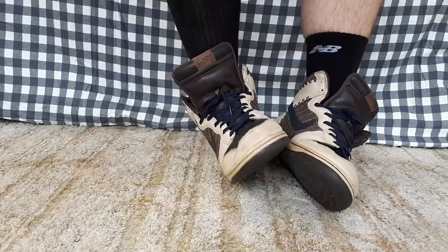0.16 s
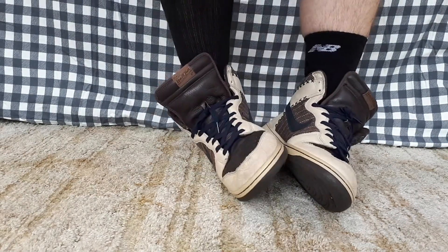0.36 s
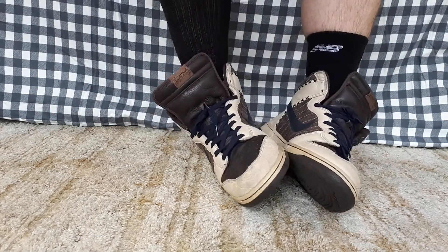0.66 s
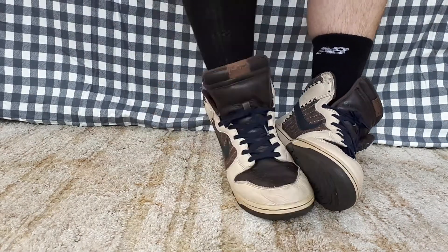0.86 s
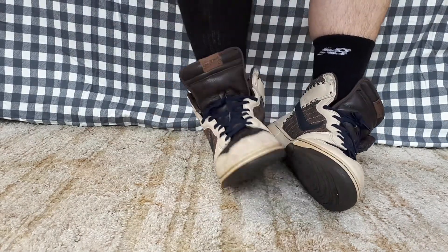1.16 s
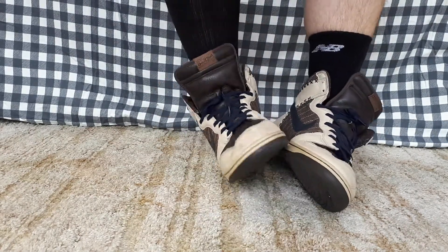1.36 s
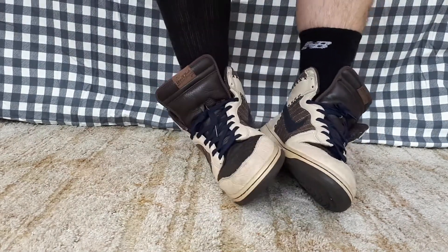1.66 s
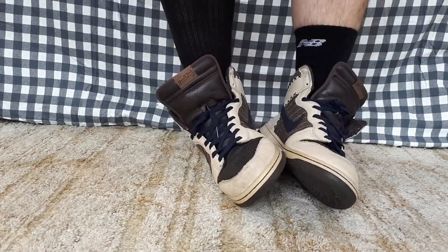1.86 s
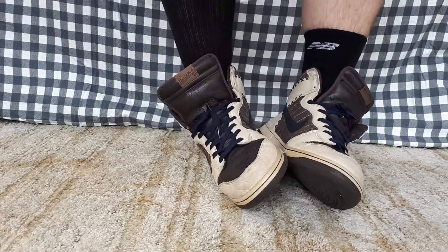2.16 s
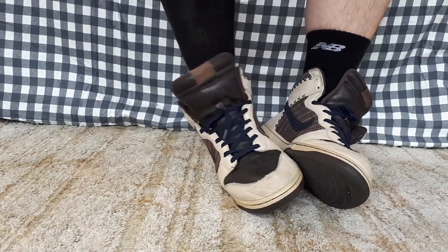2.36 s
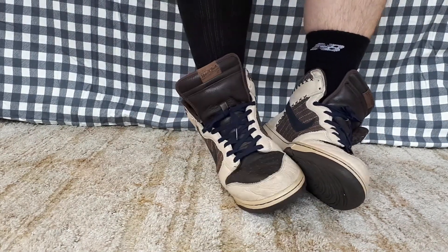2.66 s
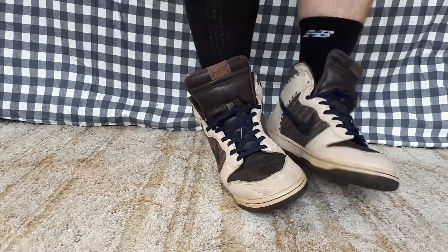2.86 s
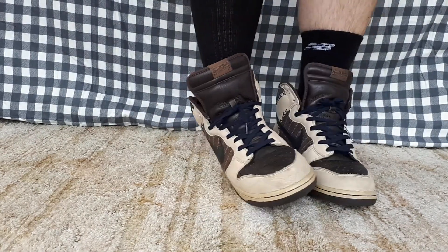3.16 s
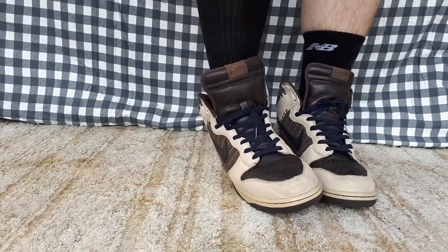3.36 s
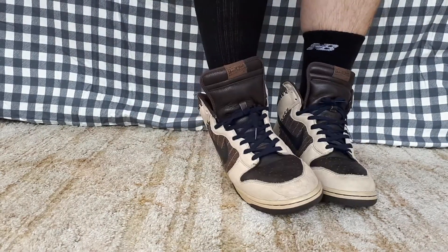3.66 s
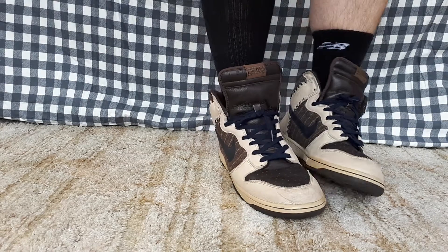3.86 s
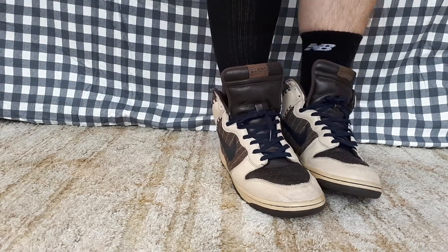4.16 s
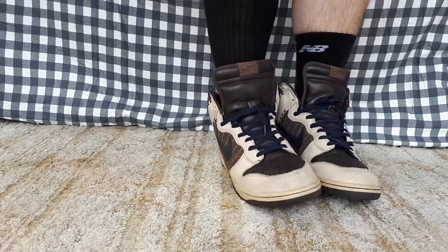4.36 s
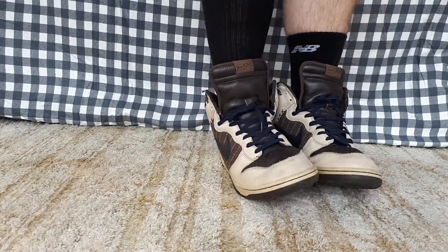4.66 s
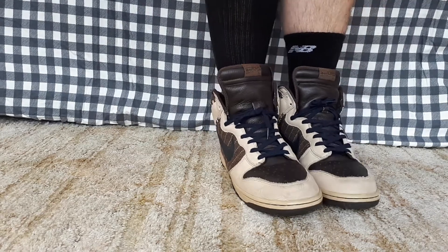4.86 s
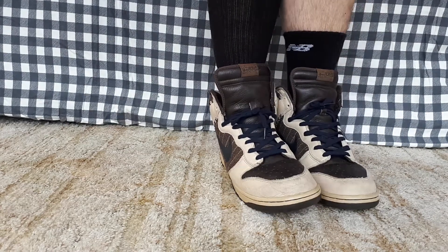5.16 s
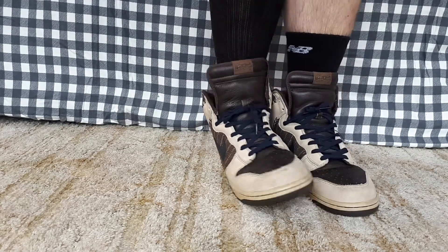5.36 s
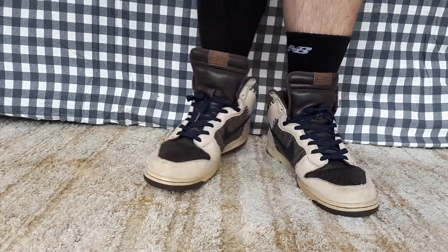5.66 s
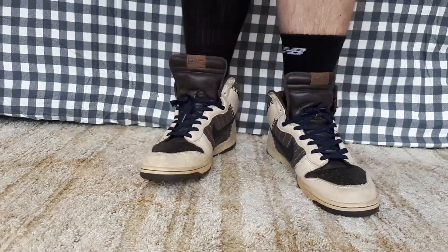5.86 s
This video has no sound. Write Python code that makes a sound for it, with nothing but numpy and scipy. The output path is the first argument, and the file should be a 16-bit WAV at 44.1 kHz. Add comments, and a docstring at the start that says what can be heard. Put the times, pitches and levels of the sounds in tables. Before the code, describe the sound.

In a small, quiet room, sneakers are rocked, knocked together and set down on carpet near the microphone. One sharp knock early on is the loudest sound; another knock and then a short patter of duller blows follow, well apart, each with a low floor thud and a clap of leather. Between them are light heel and toe touches, faint leather creaks and soft sliding over the pile.

```python
"""A faint tap on carpet, then a hard knock: two leather sneakers are rocked, knocked together and set down,
close to a phone in a small quiet room. Each blow knocks the rubber sole, thuds the floor, claps the
leather and ticks at its edge; the room answers briefly. The uppers crack and crease, lace tips flick
and the soles squeak once. Between the blows the shoes brush softly over the pile."""
import sys
import numpy as np
from scipy import signal
from scipy.fft import rfft, irfft
from scipy.io import wavfile
from scipy.ndimage import uniform_filter1d

SR = 44100
rng = np.random.default_rng(int(sys.argv[2]) if len(sys.argv) > 2 else 0)


def digitize_waveform(pressure):
    """Quantize a signal to 16-bit integers and store it at the path in sys.argv[1].

    Rows of a 2-D input are taken as channels; values are limited to [-1, 1].
    """
    field = np.atleast_2d(pressure).T
    bounded = np.clip(field, -1, 1)
    quanta = np.round(bounded * 32767).astype(np.int16)
    wavfile.write(sys.argv[1], SR, quanta)


N = 265430

# tone colours of the room tone, the reverb, the brushed pile, the leather's clap and its edge tick:
# (frequency [Hz], relative level [dB])
AIR_COLOUR = [(15, -45.5), (28, -18), (45, -13), (65, -6.5), (95, -1.5), (130, -5), (200, -9), (300, -18.5),
              (450, -21), (660, -22), (1200, -28), (2500, -34), (5400, -40), (9000, -41.5), (15500, -38.5)]
ROOM_COLOUR = [(50, -10), (150, 0), (350, -1), (700, -2.5), (1300, -1.5), (2500, -1.5), (5000, -1),
               (9000, 1), (16000, 0)]
PILE_COLOUR = [(150, -17.5), (500, -1.5), (1000, 3), (1400, 0.5), (1750, 0), (2300, 1.5), (3300, -1.5),
               (4800, -2), (6000, -1), (7400, 0), (8100, -15.5), (12500, -11), (16000, -13.5)]
CLAP_COLOUR = [(100, -16), (300, -1.5), (480, 3.5), (760, 2), (950, -6.5), (1250, 3.5), (1650, -14.5),
               (2000, -15.5), (2900, -20), (6000, -45.5), (16000, -61)]
TICK_COLOUR = [(200, -28.5), (1200, -11), (1650, -6), (2250, -2.5), (3300, -6), (4100, -9), (4900, -6.5),
               (6500, -13.5), (8400, -33.5), (12000, -24.5), (16000, -29.5)]
# the reverb's decay: (frequency [Hz], t60 [s])
ROOM_DECAY = [(150, .36), (500, 0.24), (1300, 0.22), (4500, 0.13), (12000, 0.18)]
# low resonances of floor and room: (frequency [Hz], t60 [s], level [dB])
LOW_MODES = [(125, 0.047, 3), (55.7, 0.14, -22.5), (76, 0.42, -15), (94.95, .22, -21), (108, 0.71, -24.5),
             (143.2, 0.14, -22), (157, .30, -21.5), (208, .28, -18.5), (258, .28, -20)]
# shoes sliding on the pile:
# (fastest at [s], speeding up [s], slowing [s], hiss [dB], rub [dB re hiss], rub centre [Hz])
SHOE_SLIDES = [ (0.25, 0.069, 0.11, -77.5, -1, 1000), (1.08, 0.29, .23, -75, -4, 1230),
               (1.47, 0.074, 0.12, -77.5, 0, 1003), (2.816, 0.055, 0.099, -62, 3.5, 950),
               (2.99, 0.13, 0.12, -76, 6.5, 1100), (3.20, 0.14, .13, -76, -2, 900),
               (4.299, 0.038, 0.19, -74, -6.5, 900), (4.87, 0.46, 0.25, -63, -9, 1300),
               (5.479, 0.16, 0.13, -63.5, -2, 1600)]
# leather creasing as an ankle bends: (time [s], level [dB re CREAK_DB], centre [Hz])
ANKLE_CREASES = [(0.230, -58, 355), (0.635, -60, 392), (3.190, -60.5, 416), (4.298, -49, 426),
                 (4.760, -51.5, 229), (4.884, -62.5, 269)]
# lace tips flicking against the leather: (time [s], level [dB re CREAK_DB])
LACE_FLICKS = [(0.8322, -64), (4.295, -60), (4.371, -58.5)]
# light touches of heel and toe: (time [s], knock [dB], pitch [Hz], thud [dB re knock])
LIGHT_TOUCHES = [ (0.1713, -40.5, 267, 6.5), (1.3881, -38, 340, 3.5), (2.72, -53, 920, 10),
                 (2.759, -48.5, 821, -13), (3.2892, -44, 300, 1.5), (4.138, -44, 480, -3.5),
                 (4.2905, -34.5, 383, -5.5), (4.2999, -35, 604, -27.5), (4.374, -41.5, 495, -8)]
# firm blows of heel, ball and toe:
# (time [s], knock [dB], pitch [Hz], thud [dB re knock], clap [dB re knock], tick [dB re knock])
FIRM_BLOWS = [ (0.7653, -5, 490, -13.5, -15.5, -12.5), (0.8020, -25.5, 353, -1, -6.5, -8),
              (0.832, -25, 226, -15, 5.5, 6), (2.3713, -10.5, 570, -10.5, -6.5, -20.5),
              (3.7454, -18.5, 304, -15.5, -1, -16), (3.7569, -29, 164, -22.5, -11, -26),
              (3.785, -22.5, 325, -18, -6.5, -26), (3.8058, -36.5, 320, -3, -7, -42)]

AIR_DB, CREAK_DB = -61, -6  # faders for the room tone and for all the small slipping sounds
SOLE_SEND_DB, LEATHER_SEND_DB = -12.5, -5  # reverb sends
LEFT_LAG_MS, TOP_HZ = 0.054, 15750
BLOW_CYCLES = .88  # a firm knock swells for this many of its own cycles
# each firm blow echoes once off a near wall or the ceiling
ECHO_S, ECHO_SOLE_DB, ECHO_CLAP_DB = .0145, -26.5, -15
SCUFF_DB, SCUFF_GROWTH = -48.5, .33  # level under a 0 dB tick, dB per dB of tick
CRACK_DB, CRACK_GROWTH = -18, 1.8  # level re CREAK_DB under a 0 dB knock, dB per dB of knock
CRUMPLE_DB, CRUMPLE_GROWTH = -35, .65  # likewise
TIME = np.arange(N) / SR
RING = np.arange(SR // 2) / SR  # seconds into a single hit
SIDES = np.array([[1], [-1]])


def undb(db):
    """Decibels to gain."""
    return 10 ** (np.asarray(db) / 20)


def lookup(points, hz):
    """Read (Hz, value) points on a log-frequency axis."""
    f, value = np.transpose(points)
    return np.interp(np.log(np.maximum(hz, 1)), np.log(f), value)


def add(track, s, sound):
    """Mix a sound into a track from time s on."""
    start = int(s * SR)
    part = sound[..., :N - start]
    track[..., start:start + part.shape[-1]] += part


def noise(colour, alike_hz, size=N):
    """Diffuse stereo noise, rms 1; waves longer than the microphone spacing reach both sides alike."""
    hz = np.fft.rfftfreq(size, 1 / SR)
    alike = .98 / (1 + (hz / alike_hz) ** 2)
    mid, side = rfft(rng.standard_normal((2, size)))
    stereo = np.sqrt(1 + alike) * mid + np.sqrt(1 - alike) * side * SIDES
    out = irfft(stereo * undb(lookup(colour, hz)), size)
    return out / out.std()


def click(colour, size=2048):
    """The shortest causal pulse of a given colour, peak 1."""
    cepstrum = irfft(np.log(undb(lookup(colour, np.fft.rfftfreq(size, 1 / SR)))))
    causal = 2 * cepstrum[:size // 2] * (np.arange(size // 2) > 0)
    pulse = irfft(np.exp(rfft(causal, size)))
    return pulse / abs(pulse).max()


def wander(rate_hz):
    """Smooth random drift, spread 1."""
    size = max(int(SR / rate_hz), 2)
    out = uniform_filter1d(uniform_filter1d(rng.standard_normal(N), size), size)
    return out / out.std()


def band(x, hz, octaves):
    """A sound heard through one resonance, rms 1."""
    edges = np.minimum(hz * 2 ** (np.array([-.5, .5]) * octaves), TOP_HZ)
    out = signal.sosfilt(signal.butter(2, edges, "band", fs=SR, output="sos"), x)
    return out / out.std()


def surge(swell_s):
    """A load that builds quickly and eases off, peak 1."""
    return RING / swell_s * np.exp(1 - RING / swell_s)


def room_tone():
    """A bed of low, quiet air whose level barely drifts."""
    return undb(AIR_DB + 0.22 * wander(rate_hz=2.4)) * noise(AIR_COLOUR, alike_hz=560)


def reverb(sound, first_s, build_s):
    """The walls return a dense short tail, beginning with the nearest one."""
    size = len(RING)
    hz = np.fft.rfftfreq(size, 1 / SR)
    spectrum = rfft(noise(ROOM_COLOUR, alike_hz=900, size=size))
    tail = 0
    for k, (_, t60) in enumerate(ROOM_DECAY):
        share = lookup([(f, j == k) for j, (f, _) in enumerate(ROOM_DECAY)], hz)
        tail = tail + irfft(spectrum * share, size) * np.exp(-np.log(1000) * RING / t60)
    tail *= np.clip((RING - first_s) / build_s, 0, 1)
    tail /= np.sqrt(np.sum(tail ** 2) / 2)
    return signal.fftconvolve(sound[None], tail, axes=1)[:, :N]


def slides():
    """Fibres flick past a moving shoe in a fine hiss; at speed the sole rubs and its hollow sounds."""
    fibres, drag, press = (noise(PILE_COLOUR, alike_hz=900) for _ in range(3))
    hollow = undb(-2.5) * band(drag, hz=1300, octaves=0.38)
    out = 0
    for s, rise_s, fall_s, db, rub_db, rub_hz in SHOE_SLIDES:
        speed = np.interp(TIME - s, [-rise_s, 0, fall_s], [0, 1, 0])
        rub = undb(rub_db) * band(press, rub_hz, octaves=1.7)
        out = out + undb(db) * (speed * fibres + speed ** 2 * (hollow + rub))
    return out * undb(1.1 * wander(rate_hz=100))


def scuffs(swell_s):
    """On each firm blow the sole's edge digs in; the pile crushes and springs back."""
    force = np.zeros(N)
    for s, db, *_, tick_db in FIRM_BLOWS:
        add(force, s, undb(SCUFF_DB + SCUFF_GROWTH * (db + tick_db)) * surge(swell_s))
    return force * undb(2.5 * wander(rate_hz=180)) * noise(PILE_COLOUR, alike_hz=900)


def slips(swell_s, hz, octaves, per_s=3500):
    """A crowd of tiny slips that swells and eases off, heard through one resonance."""
    crowd = (rng.random(len(RING)) < per_s / SR) * rng.standard_normal(len(RING))
    return surge(swell_s) * band(crowd, hz, octaves)


def creaks():
    """Stiff leather cracks and crumples under a blow and creases at the ankle; laces tick, soles squeak."""
    out = np.zeros(N)
    for s, db, hz, *_ in FIRM_BLOWS:
        crack = slips(swell_s=.0022, hz=2200, octaves=.65)
        add(out, s, undb(CRACK_DB + CRACK_GROWTH * db) * crack)
        crumple = slips(swell_s=.018, hz=1.5 * hz, octaves=2.2)
        add(out, s + .006, undb(CRUMPLE_DB + CRUMPLE_GROWTH * db) * crumple)
    for s, db, hz in ANKLE_CREASES:
        add(out, s, undb(db) * slips(swell_s=.019, hz=hz, octaves=1.15))
    for s, db in LACE_FLICKS:
        add(out, s, undb(db) * slips(swell_s=.0019, hz=11200, octaves=.42))
    squeak = slips(swell_s=.0015, hz=1380, octaves=.24)  # one sole grips the other for a moment
    add(out, 3.7905, undb(-31) * squeak)
    return undb(CREAK_DB) * out


def thud(cushion_ms, lowest_hz):
    """The floor's modes, pushed through soft carpet; the slowest part of the push radiates nothing."""
    age = RING * 1000 / cushion_ms
    push = age * np.exp(-age)
    modes = 0
    for k, (hz, t60, db) in enumerate(LOW_MODES):
        decay = np.exp(-np.log(1000) * RING / t60)
        modes += (-1) ** k * undb(db) * np.sin(2 * np.pi * hz * RING) * decay  # neighbours swing opposite
    cushioned = signal.fftconvolve(modes, push / push.sum())[:len(RING)]
    return signal.sosfilt(signal.butter(2, lowest_hz, "high", fs=SR, output="sos"), cushioned)


def knock(hz, swell_s):
    """The rubber sole swings up and dies within a few cycles."""
    age = RING / swell_s
    return age ** 2 * np.exp(2 - 2 * age) * np.sin(2 * np.pi * hz * RING)


def landings(settle_s):
    """The shoes strike and touch down, on two stems: sole with floor, and the leather around them."""
    soles, leather = np.zeros((2, N))
    clap, tick = click(CLAP_COLOUR), click(TICK_COLOUR)
    deep = thud(cushion_ms=0.35, lowest_hz=45)
    shallow = thud(cushion_ms=0.3, lowest_hz=115)  # a light touch barely stirs the deepest modes
    for s, db, hz, thud_db, clap_db, tick_db in FIRM_BLOWS:
        sole = knock(hz, swell_s=BLOW_CYCLES / hz)
        add(soles, s, undb(db) * sole)
        add(soles, s + settle_s, undb(db + thud_db) * deep)  # the weight arrives once the pile is flat
        add(leather, s + 0.00055, undb(db + clap_db) * clap + undb(db + tick_db) * tick)
        add(soles, s + ECHO_S, undb(db + ECHO_SOLE_DB) * sole)
        add(leather, s + ECHO_S, undb(db + clap_db + ECHO_CLAP_DB) * clap)
    for s, db, hz, thud_db in LIGHT_TOUCHES:
        sole = knock(hz, swell_s=0.0016)  # swells for as long as the contact lasts
        add(soles, s, undb(db) * sole + undb(db + thud_db) * shallow)
        add(leather, s, undb(db - 15.5) * clap)
    return signal.sosfilt(signal.butter(3, 42, "high", fs=SR, output="sos"), [soles, leather])


def scene():
    """The shoes sit a little to the right; their soles face the phone, the leather sounds all round."""
    soles, leather = landings(settle_s=0.0028)
    leather = leather + creaks()
    near = soles + leather
    left = np.interp(TIME - LEFT_LAG_MS / 1000, TIME, near)
    direct = np.array([left, near])
    send = undb(SOLE_SEND_DB) * soles + undb(LEATHER_SEND_DB) * leather
    walls = reverb(send, first_s=0.00888, build_s=.005)
    return room_tone() + walls + scuffs(swell_s=0.013) + slides() + direct


def record(dry):
    """The phone cuts the top end steeply."""
    return signal.sosfilt(signal.ellip(10, .1, 70, TOP_HZ, fs=SR, output="sos"), dry)


dry = scene()
out = record(dry)
digitize_waveform(out)
```